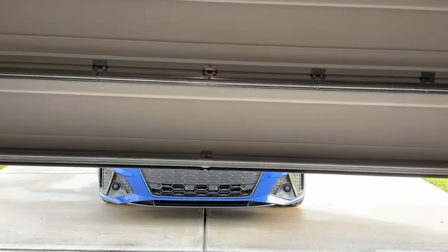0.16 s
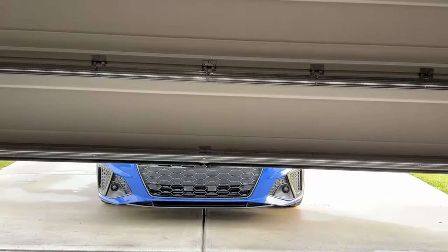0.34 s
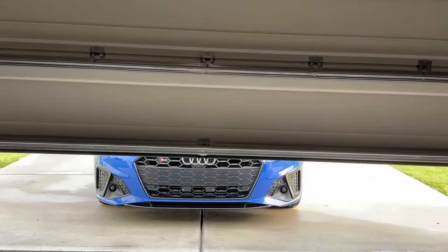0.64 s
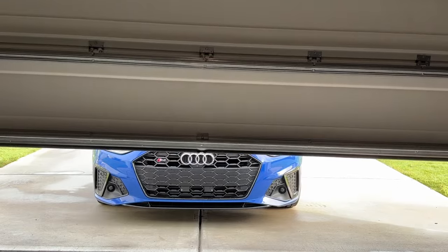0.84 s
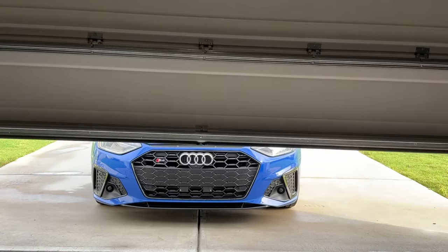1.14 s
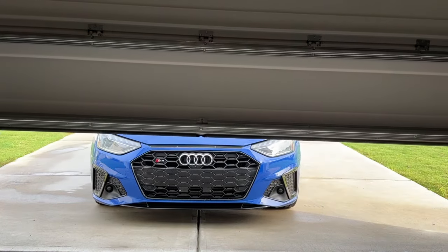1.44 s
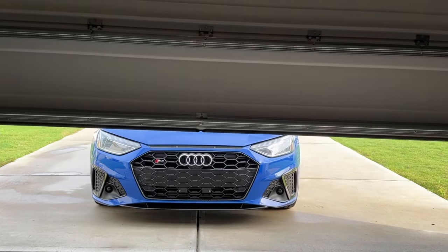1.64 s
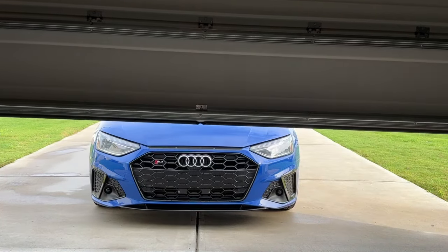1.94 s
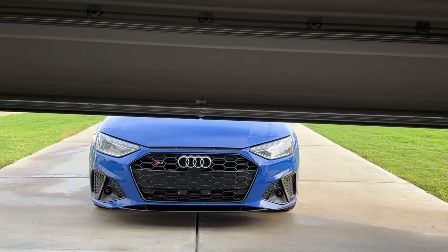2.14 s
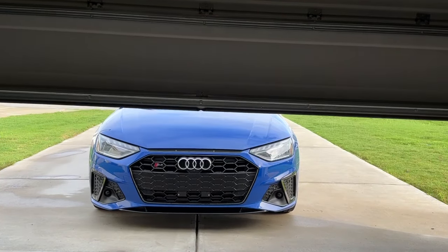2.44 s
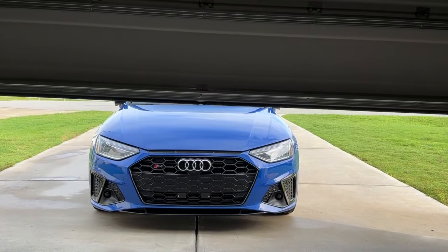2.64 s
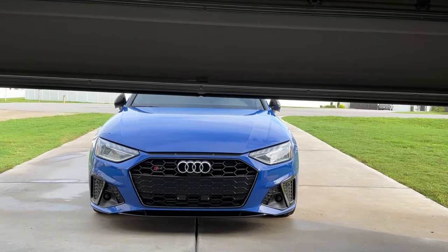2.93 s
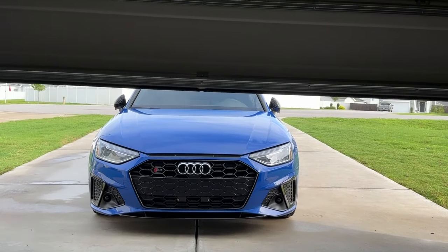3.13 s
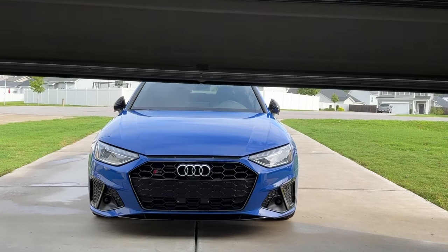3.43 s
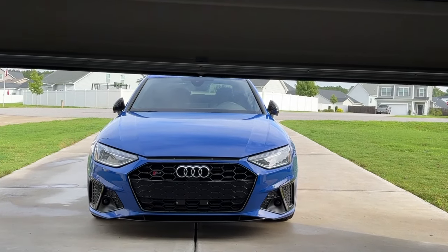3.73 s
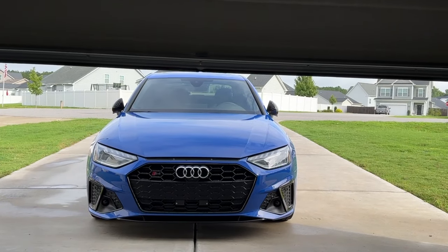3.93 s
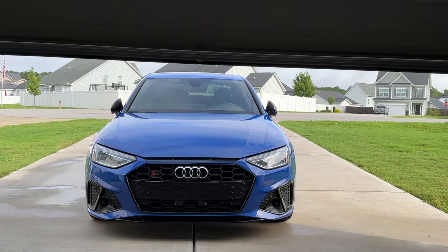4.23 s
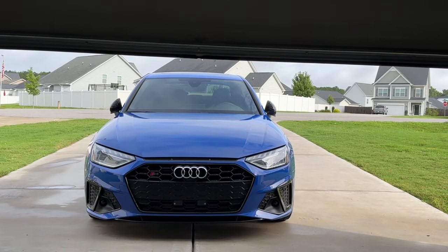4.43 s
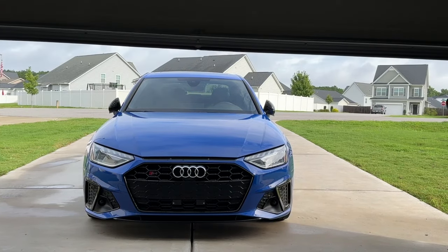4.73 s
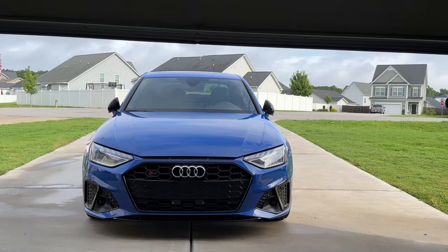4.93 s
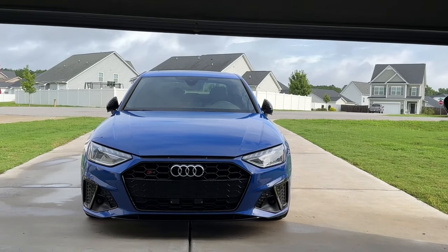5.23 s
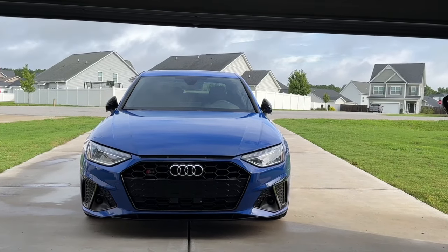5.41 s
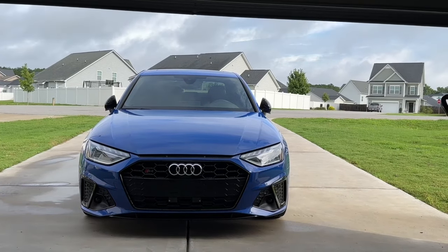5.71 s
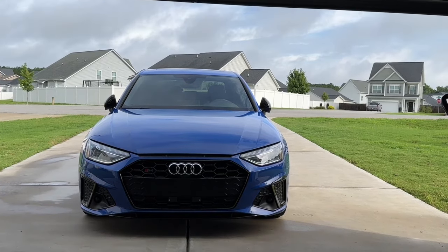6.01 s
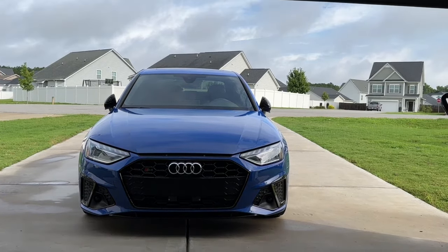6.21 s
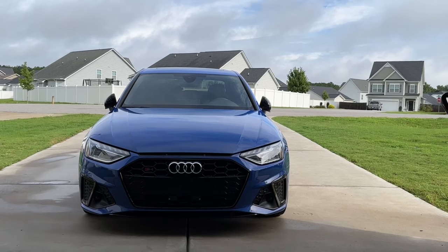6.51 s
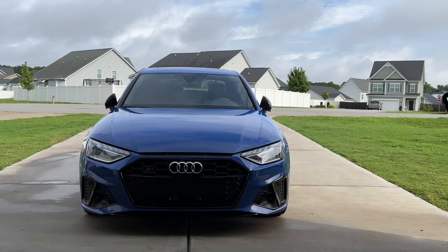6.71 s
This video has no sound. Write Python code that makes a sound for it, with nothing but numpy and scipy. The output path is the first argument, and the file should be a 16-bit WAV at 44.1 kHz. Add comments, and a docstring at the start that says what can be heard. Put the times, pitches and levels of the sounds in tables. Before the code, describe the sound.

Inside a hard-walled garage, an electric opener is already running at 0 s, its low double hum briefly strained as a sectional steel door starts up. A roller skids faintly, then hinges snap brightly around 0.4 s and in a tight cluster near 0.8 s, each crack followed by a dull thud and a slightly delayed hollow boom. Small ticks follow; around 1.3-1.7 s a roller ticks a few times, fading. Gritty rolling rumble, faint hiss and a rough mid-high gear whine carry through a calmer stretch, with soft knocks near 2 s. Snaps return at 2.7, 3.0, 3.5 and 4.0 s, the later ones sharper with metallic track ring. Knocks gather around 4.3 s, then rattle repeatedly from 5.0 to 6.7 s, strongest near 5.3 s. A last softer snap lands at 6.8 s, motor still droning.

```python
"""Inside a garage: an electric opener lifts a sectional steel door.
Motor: two wavering hums; gears: partials of a whine that sags and fades under load, plus a thin whistle.
Hinges snap and tick, rollers knock and skid: shaped noise bursts and decaying modes.
Each blow shakes bracket, track and skin, then the big panel booms a moment later.
Rollers and trolley rumble and hiss along the tracks: coloured noise."""
import sys
import numpy as np
from scipy import signal
from scipy.fft import rfft, irfft, next_fast_len
from scipy.io import wavfile
from scipy.ndimage import uniform_filter1d

SR = 44100
rng = np.random.default_rng(int(sys.argv[2]) if len(sys.argv) > 2 else 0)


def to_wav(s):
    """Save 16-bit WAV."""
    ch = np.atleast_2d(s).T  # columns
    pcm = np.round(np.clip(ch, -1, 1) * 32767)  # PCM
    wavfile.write(sys.argv[1], SR, pcm.astype(np.int16))


N = 302614
TIME_S = np.arange(N) / SR

# hinge snaps, with a dull clatter at 0.12 s and a rattle at 0.84 s that shake the same parts: (time [s], panel
# boom [dB], skin thud [dB], track ring [dB], bracket rattle [dB], skin note [Hz], boom lag [s], crack [dB],
# crack top [Hz], pin [dB], pin note [Hz], plate [dB], plate note [Hz])
HINGE_SNAPS = [(.124, -36, -32.5, -28, -40, 488, .07, -48, 15000, -48, 6540, -52, 4150),
               (.389, -21, -20, -47, -33, 361, 0.045, -24.5, 14900, -23.5, 8880, -25.5, 7080),
               (.54, -44, -40, -36, -41, 300, 0.038, -36.5, 10900, -39, 5680, -44, 8900),
               (.791, -19.5, -23.5, -34, -35.5, 329.6, 0.086, -24.5, 14000, -21.5, 8360, -26, 7350),
               (.822, -18, -19.5, -36, -30, 275, .052, -42, 15000, -30, 7000, -31, 5000),
               (.839, -24, -31, -49, -46, 599, .07, -45, 14000, -40, 6600, -46, 5500),
               (1.179, -38, -45, -48, -43.5, 387, 0.057, -33.5, 14860, -33.5, 9970, -45, 6200),
               (2.732, -26, -29.5, -42, -35, 369, 0.039, -29.5, 16000, -37, 9440, -32, 4300),
               (2.995, -25.5, -31, -40, -36.5, 481, 0.085, -30.5, 10000, -30.5, 5750, -30.5, 3370),
               (3.479, -22.5, -24, -21, -30.5, 391, 0.053, -22, 13500, -21, 13000, -25.5, 4910),
               (3.987, -20, -21.5, -19.5, -29, 421, 0.036, -20, 15850, -29, 9220, -22, 4900),
               (6.761, -22, -31.5, -32.5, -46, 396.5, .069, -36.5, 16000, -40, 14000, -39, 6444)]
# roller knocks: (time [s], panel boom [dB], skin thud [dB], track ring [dB], bracket rattle [dB],
# skin note [Hz], boom lag [s])
ROLLER_KNOCKS = [(.582, -30, -30, -49, -52, 284, 0.043), (1.98, -31, -35, -65, -70, 218, 0.045),
                 (2.1, -30, -38.5, -59, -66, 241, 0.036), (2.461, -38, -39.5, -42, -50, 404, 0.035),
                 (2.498, -42, -38, -37.5, -49, 808, 0.027), (2.765, -30, -33.5, -41, -45, 688, 0.03),
                 (3.305, -22, -26, -36, -36.5, 460, 0.052), (3.32, -26, -27, -48, -45, 329, 0.039),
                 (3.863, -29.5, -37, -46, -50, 648, 0.067), (4.251, -19.5, -26.5, -39, -46.5, 292, 0.073),
                 (4.32, -19, -29, -40, -43.5, 392, 0.064), (4.352, -26, -29, -43, -56, 339, 0.024),
                 (5.03, -28, -37, -58, -68, 298, 0.037), (5.097, -28.5, -31.5, -60, -66, 288, 0.052),
                 (5.159, -28.5, -31.5, -39, -54, 289.5, 0.038), (5.2443, -22, -27, -30.5, -58, 287, 0.041),
                 (5.329, -15, -22, -26.5, -34, 744, 0.066), (5.362, -23.5, -24.5, -30.5, -58, 301, 0.037),
                 (5.501, -19, -27.5, -31.5, -60, 302, 0.034),
                 (5.621, -20.5, -25.5, -37, -32.5, 556, 0.0283), (5.75, -21, -29.5, -34, -32.5, 649, 0.034),
                 (5.865, -22.5, -28, -31, -35, 655, 0.034), (5.952, -29, -33, -37, -43, 649, 0.019),
                 (6.046, -20.5, -28.5, -31.5, -33.5, 565, 0.046),
                 (6.211, -27, -27.5, -29.5, -44.5, 412, 0.044), (6.296, -28, -31, -29.5, -34, 660, 0.017),
                 (6.367, -32, -33.5, -29.5, -42.5, 408.4, 0.04),
                 (6.524, -35.5, -45, -33.5, -49, 500, 0.025), (6.65, -26, -39, -39.5, -56, 414.5, 0.018)]
# light hinge ticks: (time [s], level [dB])
HINGE_TICKS = [(.625, -40.5), (.728, -36), (.893, -33), (.93, -36), (1.023, -39), (1.468, -41.5),
               (2.456, -45), (2.497, -38.5), (2.838, -42.5), (3.293, -45), (3.309, -43.5), (3.405, -38.5),
               (6.749, -36.5)]
# skids of a dry roller: (time [s], axle squeal [dB], bracket [dB], track [dB])
ROLLER_SCRAPES = [(.072, -38, -38.5, -35.5), (.795, -35.5, -40, -31.5), (6.19, -49.5, -45, -38.5)]
SCRAPE_ATTACK_S, SCRAPE_RELEASE_S = 0.053, 0.073

# dense modes of the hinge: (frequency [Hz], level [dB])
HINGE_SPECTRUM = [(1600, -9), (2400, -5), (3200, 4), (4000, 6.5), (5000, 3), (6300, 5.5), (9000, 1),
                  (13000, 5.5), (16000, -9)]
# hinge plate modes: (frequency [Hz], level [dB], t60 [s])
HINGE_PLATE_MODES = [(3127, -8, .16), (3984, -4, .16), (4188, -4, .16), (4667, -6, .22), (4933, -4, .13),
                     (5340, -5, .22), (5679, -4, .22), (6256, -4, .24), (6620, -6, .24), (6780, -4, .2),
                     (7585, -2, .13), (9050, -6, .12)]
# pin's close pair of modes: (multiple of pin note [1], level [dB], decay by 60 dB [cycles of pin note])
PIN_MODE_PAIR = [(.97, -2, 2100), (1.01, 0, 2400)]
# release spike and plate ring relative to the crack; the pin's ringing pair relative to the pin [dB]
SPIKE_DB, PLATE_RING_DB, PIN_RING_DB = -1, -20, -19

# dense modes of the whole panel: (frequency [Hz], level [dB])
PANEL_SPECTRUM = [(28, -40.5), (52, -1.5), (90, 6.5), (135, -0.5), (190, -5), (300, -33)]
# dense modes of the steel skin: (frequency [Hz], level [dB])
SKIN_SPECTRUM = [(120, -16.5), (200, -3.5), (290, 0.5), (400, -1), (480, -7.5), (590, -5), (850, -19)]
# dense modes of the track: (frequency [Hz], level [dB])
TRACK_SPECTRUM = [(430, -13.5), (680, -2), (800, -2), (1030, -0.5), (1280, -3.5), (1900, -13.5)]
# dense modes of the roller bracket: (frequency [Hz], level [dB])
BRACKET_SPECTRUM = [(1000, 0), (1550, 3), (1900, 1), (2400, -1), (3100, -10.5), (4500, -21), (8000, -31)]
# roller bracket modes: (frequency [Hz], level [dB], t60 [s])
BRACKET_RINGS = [(1230, -17, 0.044), (1490, -1, 0.15), (1637, -2.5, 0.26), (1790, -2, 0.19),
                 (2330, 0.5, 0.083), (2650, -4, 0.088), (3140, -10, 0.14)]
# track modes under a knock: (frequency [Hz], level [dB], t60 [s])
TRACK_RINGS = [(657, -4, 0.13), (783, -8, 0.31), (873, 8, 0.082), (966, -4.5, 0.23)]
# strut modes in the track beside a snapping hinge: (frequency [Hz], level [dB], t60 [s])
STRUT_RINGS = [(946, -5, 0.09), (985, 3, 0.073), (1036, -8, 0.27), (1090, -20, 0.31), (1200, -8.5, 0.16),
               (1455, -9, 0.17), (1660, -21, .15), (1827, -25.5, 0.63)]
# drum notes of a section after a snap: (frequency [Hz], level [dB], rise [s], t60 [s])
SECTION_DRUM_NOTES = [(58, -2.5, 0.087, 0.52), (190.2, -4.5, 0.031, 0.48), (262.2, -7.5, 0.056, 0.32),
                      (419, -13, 0.0074, 0.18), (520, -12, 0.014, 0.3), (593, -7, 0.0094, 0.27)]
CLANK_HZ, CLANK_DB = 1014, 4.5  # strut's short clank, relative to the track's ring
# lowest section hums on after a blow while the door is nearly upright
SECTION_HZ, SECTION_DB, SECTION_FADE_DB_PER_S = 130, 17, 15
REBOUND_S, REBOUND_DB = .033, -11  # loose roller falls back against its bracket

# reach of a light tick, also the axle squeal: (frequency [Hz], level [dB])
TICK_SPECTRUM = [(1800, 5), (3500, 2.5), (5000, 1.5), (6800, 1), (9000, -9.5), (12000, -3.5), (16000, -24)]
# a roller ticks once a turn, ever more faintly, and rubs its bracket
TURN_START_S, TURN_S, TURN_DB, TURN_FADE_DB = 1.2645, .144, -39.5, 3
RUB_DB = -43

# opener speed and whine: (time [s], gear whine [Hz], level [dB])
GEAR_SPEED = [(0, 970, -55), (.8, 946, -74), (1.1, 981, -47.5), (1.4, 978, -54), (1.65, 985, -48),
              (1.83, 995, -49.5), (2.0, 982, -50.5), (2.15, 991, -53), (2.35, 939, -51.5), (2.6, 901, -58),
              (3.75, 929, -52.5), (4.2, 946, -47.5), (4.33, 941, -46.5), (4.46, 973, -49.5),
              (4.57, 968.4, -48), (4.8, 987.5, -49), (5.1, 994, -49.5), (5.4, 930, -53.5), (6.86, 987, -51)]
# gear train partials: (multiple of the whine [1], level [dB])
GEAR_PARTIALS = [(0.751, -8), (1, 0.5), (1.124, -8), (2, -9)]
# gears' thin whistle: (time [s], level [dB])
WHISTLE_LEVEL = [(0, -75), (1.7, -74), (2.1, -67.5), (2.6, -72), (4.1, -72), (4.27, -61), (4.42, -73),
                 (4.7, -75), (5.02, -70), (5.4, -75), (6.86, -75)]
DULL_DB_PER_OCTAVE_S = 1.1  # whine dulls as the door opens
# the hums at usual speed; running free, the lower one weakens
USUAL_WHINE_HZ, MAINS_DB, DOUBLE_DB, MAINS_DB_PER_PERCENT = 930, -39.5, -37, -0.77
STRAIN_DB, STRAIN_S = 7, 0.18  # harder hum while getting the door moving

# rolling along the tracks: (time [s], rumble [dB], hiss [dB])
ROLL_LEVELS = [(0, -36, -50), (.9, -35, -51.5), (1.3, -37.5, -53.5), (2.2, -42, -53.5), (3, -37.5, -55),
               (3.7, -41, -55), (4.9, -41.5, -55.5), (5.8, -37.5, -54.5), (6.86, -37.5, -54)]
# rolling rumble: (frequency [Hz], relative density [dB])
RUMBLE_SPECTRUM = [(25, -40), (45, 9), (85, 12.5), (150, 5), (220, -1), (300, -0.5), (430, -2), (560, -2.5),
                   (740, -0.5), (880, -6), (1080, -5), (1600, -11), (2200, -24.5), (4000, -27.5)]
# rolling hiss: (frequency [Hz], relative density [dB])
HISS_SPECTRUM = [(1200, 1), (2500, 8.5), (4000, 2), (6500, 4.5), (9000, -4.5), (12000, 5), (16000, -6)]

# stereo width in the garage: (frequency [Hz], side minus mid [dB])
SIDE_WIDTH = [(60, -21), (110, -17.5), (200, -10.5), (380, -5.5), (700, -3), (1290, -4.5), (2380, -10),
              (4400, -16.5), (9000, -22), (14000, -20)]
# right side, a little weaker: (frequency [Hz], gain [dB])
RIGHT_GAIN = [(1, -.5), (60, -.5), (250, -1), (900, -1.8), (4400, -.5), (22050, -.2)]
# microphone colour: (frequency [Hz], gain [dB])
MIC_RESPONSE = [(20, 0.5), (6500, -4), (7800, -0.5), (8900, 5), (9600, 2), (10600, -12.5), (12000, -14),
                (13400, -8.5), (15300, -3), (16000, 1)]
# phase between the resonant microphone ports: (frequency [Hz], lead of the left [rad])
PORT_LEAD = [(6600, 0), (7240, 1.2), (7800, 2.8), (8400, 3.2), (9220, 1.5), (10400, 0), (13400, 0),
             (14800, -1), (16000, -2.5)]
TOP_HZ = 15900


def undb(db):
    """Decibels to gain."""
    return 10 ** (np.asarray(db) / 20)


def curves(table):
    """Each column of a table, joined by straight lines in time."""
    s, *columns = np.transpose(table)
    return [np.interp(TIME_S, s, c) for c in columns]


def response(points, size):
    """Minimum-phase response through (frequency [Hz], level [dB]) points, made by cepstral folding."""
    hz, db = np.transpose(points)
    f = np.maximum(np.fft.rfftfreq(size, 1 / SR), 1)
    # 18 dB per octave beyond the end points, for three octaves
    octaves_out = np.maximum(np.log2(hz[0] / f), 0) + np.maximum(np.log2(f / hz[-1]), 0)
    gain_db = np.interp(np.log(f), np.log(hz), db) - 18 * np.minimum(octaves_out, 3)
    cepstrum = irfft(np.log(undb(gain_db)), size)
    cepstrum[1:size // 2] *= 2
    cepstrum[size // 2 + 1:] = 0
    return np.exp(rfft(cepstrum))


def colour(x, points, keep_power=False):
    """Filter by a spectrum; on request white noise keeps its power."""
    size = 2 * next_fast_len(x.shape[-1] // 2 + 4096)
    h = response(points, size)
    if keep_power:
        h = h / np.sqrt(np.mean(abs(h) ** 2))
    return irfft(rfft(x, size) * h, size)[..., :x.shape[-1]]


def walk(rate_hz):
    """Slow smoothed chance with a spread near 1."""
    k = max(int(SR / rate_hz), 2)
    steps = rng.standard_normal(4096)[np.arange(N) // k % 4096]
    return 1.3 * uniform_filter1d(uniform_filter1d(steps, k), k)


def add(out, s, sound):
    """Mix a sound in at a time."""
    i = max(int(s * SR), 0)
    out[..., i:i + sound.shape[-1]] += sound[..., :N - i]


def soft_onset(t, rise_s):
    """Smooth rise from 0 to 1 as a part takes up a blow."""
    return 1 - np.exp(-(t / rise_s) ** 2)


def shake(blows, spectrum, rise_s, fall_s, room_db, room_t60, chatter_db, vary_db, escape_db_per_s):
    """Blows on a part with dense modes (mid, side): a chattering burst, then the garage's tail."""
    out, t = np.zeros((2, N)), np.arange(SR // 2) / SR
    onset = soft_onset(t, rise_s)
    hz, part_db = np.transpose(spectrum)
    places_hz = np.geomspace(hz[0], hz[-1], 16)
    places_db = np.interp(np.log(places_hz), np.log(hz), part_db)
    for s, db in blows:
        # contact force jumps every 64 samples
        contact = undb(chatter_db * np.repeat(rng.standard_normal(len(t)), 64)[:len(t)])
        burst = contact / np.sqrt(np.mean(contact ** 2)) * np.exp(-t / fall_s)
        # the wider the opening, the less stays in the garage
        tail = undb(room_db - escape_db_per_s * s - 60 * t / room_t60)
        envelope = onset * np.hypot(burst, tail)
        # every contact point favours other modes
        favoured_db = places_db + vary_db * rng.standard_normal(len(places_hz))
        noise = envelope * rng.standard_normal((2, len(t)))
        sound = colour(noise, np.column_stack([places_hz, favoured_db]))
        # energy set by the envelope, not by the spectrum
        level = np.sqrt(np.sum(envelope ** 2) / np.sum(sound ** 2, axis=1, keepdims=True))
        add(out, s, undb(db) * sound * level)
    return out


def modes(blows, table, db_gain, detune, vary_db, rise_s):
    """A small steel part rings in decaying sines (mid, side), a little differently at each blow."""
    out, t = np.zeros((2, N)), np.arange(SR // 4) / SR
    hz, mode_db, t60 = np.transpose(table)[:, :, None]
    decay = soft_onset(t, rise_s) * undb(mode_db - 60 * t / t60)
    for s, db in blows:
        shift, strength, side = rng.standard_normal((3, len(hz)))
        ring = decay * np.sin(2 * np.pi * hz * (1 + detune * shift[:, None]) * t)
        mid_side = np.array([undb(vary_db * strength), side])
        add(out, s, undb(db + db_gain) * mid_side @ ring)
    return out


def clang(blows, db_gain, rise_s, t60, split=0.0726):
    """The mode nearest to the contact rings as a close pair and gives the blow its note."""
    out, t = np.zeros(N), np.arange(SR // 2) / SR
    envelope = soft_onset(t, rise_s) * undb(-60 * t / t60)
    for (s, db, hz), chance in zip(blows, rng.standard_normal(len(blows))):
        partner_hz = hz * (1 + split * chance)
        pair = np.sin(2 * np.pi * hz * t) + .5 * np.cos(2 * np.pi * partner_hz * t)
        add(out, s, undb(db + db_gain) * envelope * pair)
    return out


def hinges():
    """Dry steel hinges let go with a crack; plate rings, pin and plate buzz at their own notes."""
    out = np.zeros((2, N))
    for s, *_, db, top_hz, pin_db, pin_hz, plate_db, plate_hz in HINGE_SNAPS:
        # a softer release reaches fewer of the high modes
        reached = [(hz, part_db - 10 * np.log10(1 + (hz / top_hz) ** 8)) for hz, part_db in HINGE_SPECTRUM]
        out += shake([(s, db)], reached, rise_s=0.0018, fall_s=0.0077, room_db=-8, room_t60=0.46,
                     chatter_db=4, vary_db=1.2, escape_db_per_s=0)
        # the release itself: a dry spike ahead of the ring
        out += shake([(s, db + SPIKE_DB)], reached, rise_s=.0006, fall_s=.003, room_db=-30, room_t60=.2,
                     chatter_db=3, vary_db=1.2, escape_db_per_s=0)
        out += modes([(s, db)], HINGE_PLATE_MODES, db_gain=PLATE_RING_DB, detune=.002, vary_db=2, rise_s=.001)
        pin = [(pin_hz / 1.2, -20), (pin_hz, 0), (pin_hz * 1.16, -20)]
        out += shake([(s, pin_db)], pin, rise_s=.0005, fall_s=0.0068, room_db=-13, room_t60=0.42,
                     chatter_db=4, vary_db=1, escape_db_per_s=0)
        pin_modes = np.array(PIN_MODE_PAIR) * [pin_hz, 1, 1 / pin_hz]
        out += modes([(s, pin_db)], pin_modes, db_gain=PIN_RING_DB, detune=.002, vary_db=1, rise_s=.001)
        plate = [(plate_hz / 1.12, -20), (plate_hz, 0), (plate_hz * 1.12, -20)]
        out += shake([(s, plate_db)], plate, rise_s=.0006, fall_s=0.007, room_db=-20, room_t60=0.3,
                     chatter_db=4, vary_db=1, escape_db_per_s=0)
    return out


def door():
    """Each blow shakes bracket, track, steel skin and at last the whole panel."""
    blows = np.vstack([np.array(HINGE_SNAPS)[:, :7], ROLLER_KNOCKS])
    s, boom_db, thud_db, ring_db, rattle_db, note_hz, lag_s = blows.T
    snap = np.arange(len(s)) < len(HINGE_SNAPS)
    out = track_rings(np.column_stack([s, ring_db]), snap)
    out += bracket_rattles(np.column_stack([s, rattle_db]), snap)
    out += skin_notes(np.column_stack([s, thud_db]), snap, note_hz, lag_s)
    return out + panel_booms(np.column_stack([s, boom_db]), snap, lag_s)


def panel_booms(panel, snap, lag_s):
    """The big panel shakes in its low modes; the slow bending wave follows as a boom."""
    out = shake(panel[snap], PANEL_SPECTRUM, rise_s=0.016, fall_s=0.028, room_db=-3.5, room_t60=0.68,
                chatter_db=5, vary_db=1.5, escape_db_per_s=0.5)
    out += undb(-1.5) * shake(panel[~snap], PANEL_SPECTRUM, rise_s=0.016, fall_s=0.026, room_db=-5.5,
                              room_t60=0.6, chatter_db=4, vary_db=1.5, escape_db_per_s=0.3)
    # a snap starts a long swell at the panel's edge; a roller gives it one short shove
    waves = np.column_stack([panel, lag_s])
    out[0] += flex(waves[snap], db_gain=-6.0, length_s=0.035, pitch_hz=118.9, glide_per_s=2.6)
    out[0] += flex(waves[~snap], db_gain=0.5, length_s=0.017, pitch_hz=103.05, glide_per_s=7.83)
    return out


def flex(blows, db_gain, length_s, pitch_hz, glide_per_s):
    """The slowest, lowest bending wave arrives late as a boom; rows (time [s], level [dB], lag [s])."""
    out, t = np.zeros(N), np.arange(SR // 4) / SR
    for (s, db, lag_s), tight in zip(blows, rng.standard_normal(len(blows))):
        u = t - lag_s
        hz = pitch_hz * np.exp(0.085 * tight - glide_per_s * u)
        swell = np.exp(-(u / length_s) ** 2) * np.minimum(t / lag_s, 1)
        add(out, s, undb(db + db_gain) * swell * np.sin(2 * np.pi * np.cumsum(hz) / SR))
    return out


def skin_notes(skin, snap, note_hz, lag_s):
    """The steel skin thuds and sounds the note of the contact; drum and section notes linger."""
    out = undb(-2) * shake(skin, SKIN_SPECTRUM, rise_s=0.0032, fall_s=0.015, room_db=-4, room_t60=0.5,
                           chatter_db=2.0, vary_db=1.0, escape_db_per_s=0)
    notes = np.column_stack([skin, note_hz])
    out[0] += clang(notes, db_gain=-0.5, rise_s=0.009, t60=0.16)
    out[0] += thud(np.column_stack([notes, lag_s]), db_gain=-4.5, rise_s=0.0015, end_hz=161.8, hold=0.81)
    for hz, note_db, rise_s, t60 in SECTION_DRUM_NOTES:
        out[0] += clang([(at, db, hz) for at, db in skin[snap]], note_db, rise_s, t60)
    upright = [(at, db - SECTION_FADE_DB_PER_S * at, SECTION_HZ) for at, db in skin]
    out[0] += clang(upright, db_gain=SECTION_DB, rise_s=.11, t60=0.45, split=0.0062)
    return out


def thud(blows, db_gain, rise_s, end_hz, hold):
    """High bending waves outrun low ones, so the pitch falls; rows (time [s], level [dB], note [Hz], lag [s])."""
    out, t = np.zeros(N), np.arange(SR // 6) / SR
    for s, db, note_hz, lag_s in blows:
        progress = np.minimum(t / lag_s, 1) ** 1.308
        hz = note_hz * (end_hz / note_hz) ** progress
        envelope = soft_onset(t, rise_s) * np.exp(-(t / (hold * lag_s)) ** 2)
        add(out, s, undb(db + db_gain) * envelope * np.sin(2 * np.pi * np.cumsum(hz) / SR))
    return out


def track_rings(track, snap):
    """The track rings; a snap also clanks the strut beside the hinge."""
    out = undb(-0.5) * shake(track[snap], TRACK_SPECTRUM, rise_s=0.0024, fall_s=0.0069, room_db=-2,
                             room_t60=0.53, chatter_db=-10, vary_db=3.5, escape_db_per_s=1.5)
    out += shake(track[~snap], TRACK_SPECTRUM, rise_s=0.0038, fall_s=0.0052, room_db=-2.0, room_t60=0.32,
                 chatter_db=5.5, vary_db=4.0, escape_db_per_s=0.5)
    out += modes(track[~snap], TRACK_RINGS, db_gain=-0.5, detune=0.0197, vary_db=0.5, rise_s=0.0074)
    out += modes(track[snap], STRUT_RINGS, db_gain=-0.5, detune=0.0084, vary_db=-0.5, rise_s=0.0021)
    clanks = [(at, db, CLANK_HZ) for at, db in track[snap]]
    out[0] += clang(clanks, db_gain=CLANK_DB, rise_s=0.0028, t60=0.036)
    return out


def bracket_rattles(bracket, snap):
    """Roller brackets rattle and ring; after a knock the loose roller strikes its bracket again."""
    out = shake(bracket[snap], BRACKET_SPECTRUM, rise_s=0.00091, fall_s=0.013, room_db=0.0, room_t60=0.6,
                chatter_db=9.0, vary_db=3.0, escape_db_per_s=2.5)
    rattles = np.vstack([bracket[~snap], bracket[~snap] + [REBOUND_S, REBOUND_DB]])
    out += undb(2) * shake(rattles, BRACKET_SPECTRUM, rise_s=.0006, fall_s=.008, room_db=-10, room_t60=.5,
                           chatter_db=3, vary_db=2, escape_db_per_s=0)
    return out + modes(bracket, BRACKET_RINGS, db_gain=-9.0, detune=0.0144, vary_db=5, rise_s=0.0016)


def ticks(turn_count):
    """Light ticks of the hinges, and of a roller that also rubs its bracket once a turn."""
    turns = [(TURN_START_S + k * TURN_S, TURN_DB - k * TURN_FADE_DB) for k in range(turn_count)]
    all_ticks = list(HINGE_TICKS) + turns
    out = shake(all_ticks, TICK_SPECTRUM, rise_s=0.00053, fall_s=0.0084, room_db=-7.0, room_t60=0.5,
                chatter_db=2.5, vary_db=1.5, escape_db_per_s=0.5)
    rubs = [(s, RUB_DB) for s, _ in turns]
    return out + shake(rubs, BRACKET_SPECTRUM, rise_s=.004, fall_s=.022, room_db=-7, room_t60=.5,
                       chatter_db=4, vary_db=2, escape_db_per_s=0)


def scrape(grit_db):
    """A dry roller skids briefly: dense slips excite its axle, its bracket and the track."""
    start_s, *levels = np.transpose(ROLLER_SCRAPES)
    t = TIME_S - start_s[:, None]
    attack = np.clip(t / SCRAPE_ATTACK_S, 0, 1)
    release = np.exp(-np.maximum(t - SCRAPE_ATTACK_S, 0) / SCRAPE_RELEASE_S)
    slips = undb(grit_db * walk(300)) * rng.standard_normal((2, N))
    out = np.zeros((2, N))
    for spectrum, db in zip((TICK_SPECTRUM, BRACKET_SPECTRUM, TRACK_SPECTRUM), levels):
        strength = undb(db) @ (attack * release)
        out += colour(strength * slips, spectrum, keep_power=True)
    return out


def opener():
    """Motor hums near mains frequency and twice that; under load the gear whine sags and fades."""
    whine_hz, whine_db = curves(GEAR_SPEED)
    extra_percent = 100 * (whine_hz / USUAL_WHINE_HZ - 1)
    mains_db = MAINS_DB + MAINS_DB_PER_PERCENT * extra_percent + 3.5 * walk(8.3)
    double_db = DOUBLE_DB + STRAIN_DB * np.exp(-(TIME_S / STRAIN_S) ** 2) + 3.34 * walk(10)
    out = np.zeros((2, N))
    out[0] += undb(mains_db) * np.sin(2 * np.pi * 57.5 * TIME_S + 1.2 * walk(8))
    out[0] += undb(double_db) * np.sin(2 * np.pi * 119.7 * TIME_S + 0.46 * walk(17))
    # the teeth mesh unevenly, which roughens the whine
    whine_db = whine_db + .8 * walk(70)
    phase = 2 * np.pi * np.cumsum(whine_hz * (1 + .003 * walk(25))) / SR
    for order, partial_db in GEAR_PARTIALS:
        db = whine_db + partial_db - DULL_DB_PER_OCTAVE_S * np.log2(order) * TIME_S
        for channel in out:
            # wall paths come and go: mid and side waver separately
            channel += undb(db + 1.2 * walk(16)) * np.sin(order * phase + .6 * walk(11))
    # whistle two octaves above the whine
    whistle_db, = curves(WHISTLE_LEVEL)
    out[0] += undb(whistle_db + 3.5 * walk(22)) * np.sin(4 * phase + 1.2 * walk(45))
    return out


def rolling(grit_db, surge_db):
    """Rollers and trolley run over small bumps: gritty rumble with a faint smooth hiss."""
    rumble_db, hiss_db = curves(ROLL_LEVELS)
    bumps = undb(grit_db * walk(130) + surge_db * walk(13))
    bumps = bumps / np.sqrt(np.mean(bumps ** 2))
    rumble = colour(bumps * rng.standard_normal((2, N)), RUMBLE_SPECTRUM, keep_power=True)
    hiss = colour(rng.standard_normal((2, N)), HISS_SPECTRUM, keep_power=True)
    return undb(rumble_db) * rumble + undb(hiss_db) * hiss


def scene():
    """Door and opener in the garage, a little stronger on the left."""
    blows = hinges() + door() + ticks(turn_count=4) + scrape(grit_db=0.5)
    drive = opener() + rolling(grit_db=1.7, surge_db=.9)
    mid, side = blows + drive
    side = colour(side, SIDE_WIDTH)
    return np.array([mid + side, colour(mid - side, RIGHT_GAIN)])


def record(dry):
    """The microphone ports resonate, and the right one turns in phase there; the top is cut."""
    left, right = colour(dry, MIC_RESPONSE)
    size = 2 * next_fast_len(N // 2 + 4096)
    lag_rad = np.interp(np.fft.rfftfreq(size, 1 / SR), *np.transpose(PORT_LEAD))
    right = irfft(rfft(right, size) * np.exp(-1j * lag_rad), size)[:N]
    top_cut = signal.ellip(8, .2, 70, TOP_HZ, fs=SR, output="sos")
    return signal.sosfilt(top_cut, np.array([left, right]))


dry = scene()
out = record(dry)
to_wav(out)
```